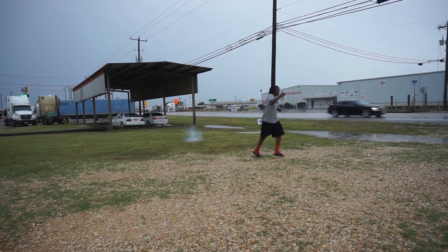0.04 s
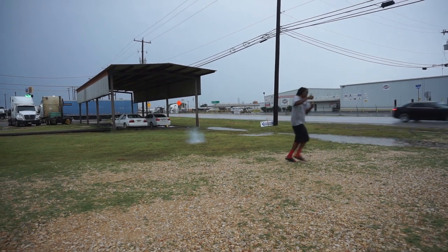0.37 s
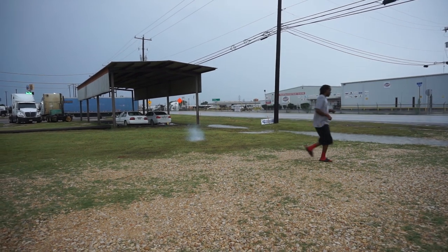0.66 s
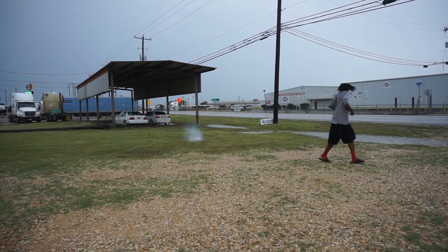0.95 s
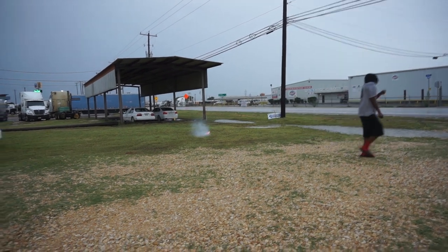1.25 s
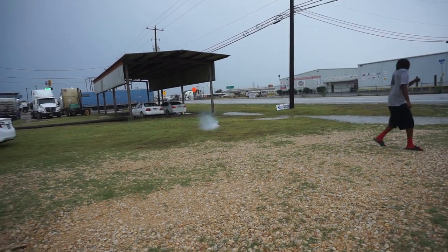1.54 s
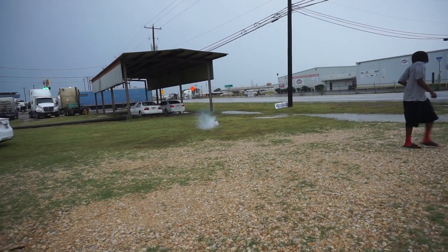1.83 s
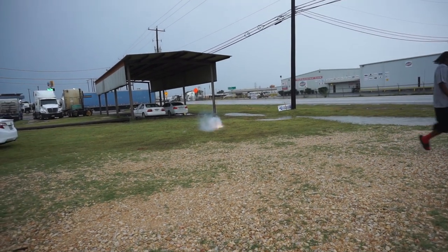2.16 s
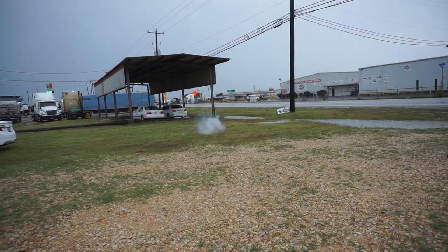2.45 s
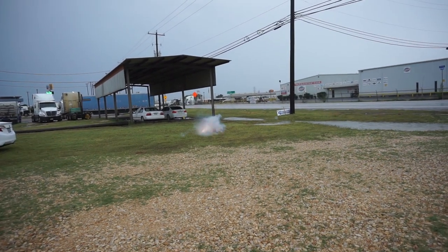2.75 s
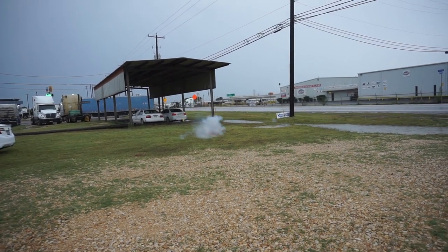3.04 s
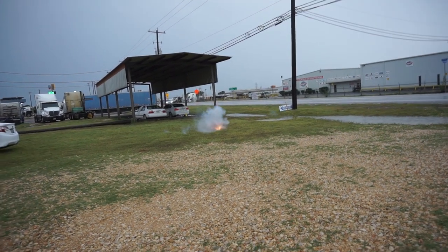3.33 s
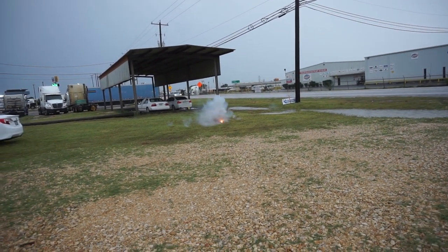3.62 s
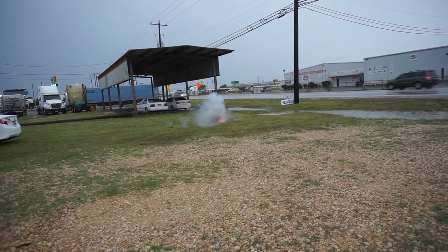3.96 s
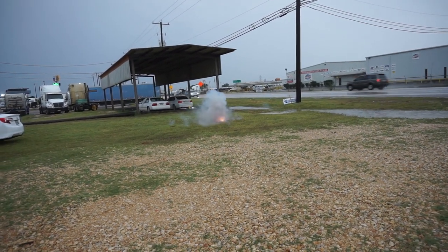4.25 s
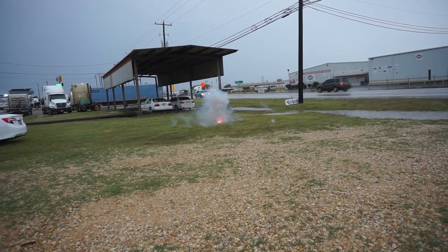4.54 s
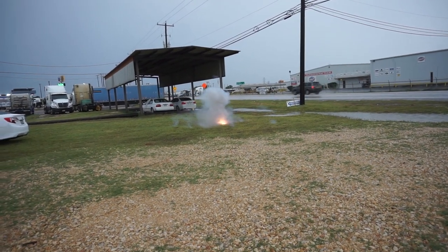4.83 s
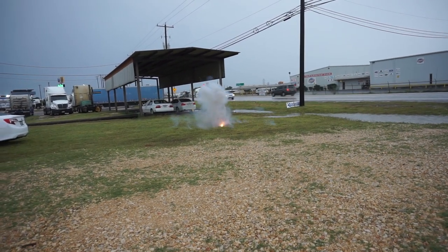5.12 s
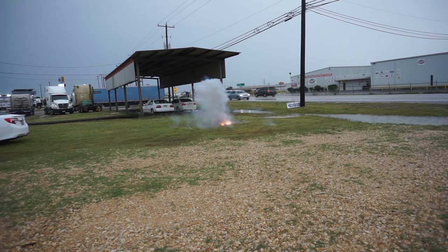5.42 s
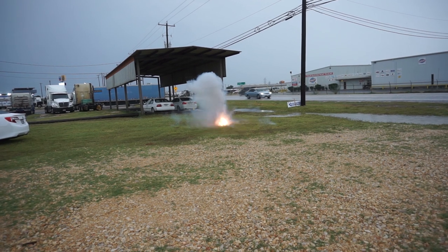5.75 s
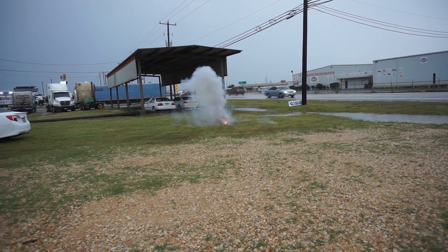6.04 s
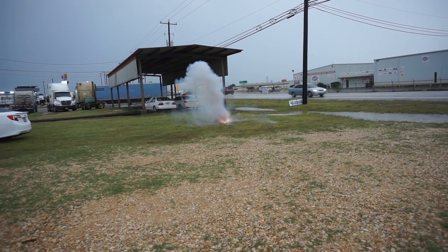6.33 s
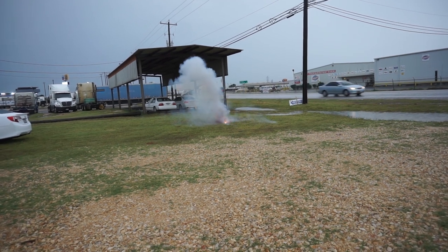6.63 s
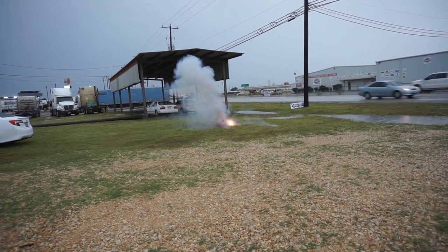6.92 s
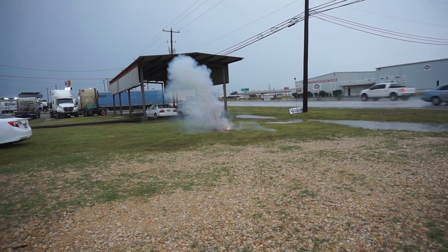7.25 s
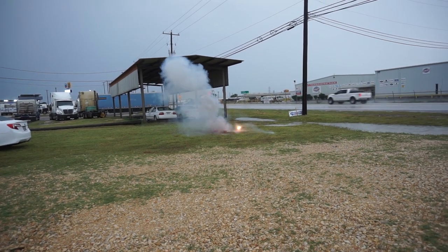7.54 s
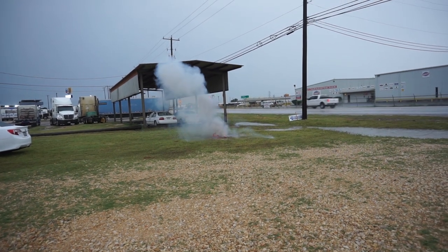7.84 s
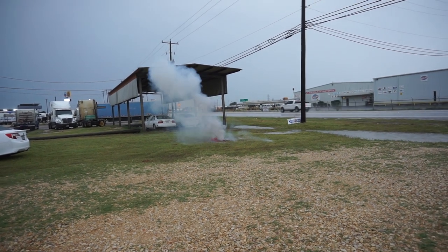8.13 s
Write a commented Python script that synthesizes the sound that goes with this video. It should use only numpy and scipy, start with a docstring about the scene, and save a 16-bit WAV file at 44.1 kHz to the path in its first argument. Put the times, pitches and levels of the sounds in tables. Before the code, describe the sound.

A car passes on the right, its tyres roaring and hissing on a wet road. As it fades, a sharp bang starts a string of firecrackers some distance away outdoors. They pop in fast, uneven runs for about six seconds, echoing lightly off buildings. Two thirds of the way through, the sound drops out for an instant and returns duller and in mono. The popping stops just before the end.

```python
"""A car hisses past on the right, its tyres roaring and throwing spray on a wet road, over a soft wash.
As it leaves, a fuse spits and a string of firecrackers goes off on the grass some fifteen metres away.
Hundreds of paper tubes burst in uneven runs. Each sends out a sharp jump in air pressure, a shock wave,
which bounces off the ground and echoes from a shed and far buildings.
Two thirds through, the sound cuts out for an instant and returns dull and the same in both ears."""
import sys
import numpy as np
from scipy import signal
from scipy.fft import rfft, irfft
from scipy.io import wavfile
from scipy.ndimage import uniform_filter1d, map_coordinates

SR = 44100
rng = np.random.default_rng(int(sys.argv[2]) if len(sys.argv) > 2 else 0)


def materialize(psi):
    """Save the field psi as 16-bit PCM at rate SR to the path in sys.argv[1].

    A 1-D psi becomes a single channel; in a 2-D psi each row is a channel.
    """
    bounded = np.clip(np.atleast_2d(psi).T, -1, 1)
    quanta = np.round(bounded * 32767).astype(np.int16)
    wavfile.write(sys.argv[1], SR, quanta)


N = 369558


def undb(db):
    """Turn decibels into a number to multiply by."""
    return 10 ** (np.asarray(db) / 20)


def colour_db(points, f):
    """A tone colour: the level at each frequency f, falling away below the lowest point."""
    hz, db = np.transpose(points)
    return np.interp(np.log(f + 1), np.log(hz), db) - 10 * np.log10(1 + (.5 * hz[0] / (f + 10)) ** 2)


def resonance_db(modes, f):
    """The peaks and dips that resonances add to a tone colour."""
    return sum(db / (1 + (2 * (f - hz) / width) ** 2) for hz, width, db in modes)


def curves(table):
    """Join a table's points in time with straight lines, one curve per column."""
    times, *columns = np.transpose(table)
    return [np.interp(np.arange(N) / SR, times, column) for column in columns]


def unit(x):
    """Scale to an average power of 1."""
    return x / np.sqrt(np.mean(x ** 2))


def wander(rate_hz):
    """A smooth random wobble of about size 1."""
    hold = int(SR / rate_hz)
    steps = np.repeat(rng.standard_normal(N // hold + 1), hold)
    return unit(uniform_filter1d(uniform_filter1d(steps, hold), hold)[:N])


def opposite(x):
    """Plus x for the left side, minus x for the right."""
    return np.array([[1], [-1]]) * x


def stereo_noise(f, apart_hz):
    """Noise spectra at two close microphones: alike in the bass, unrelated in the treble."""
    mid, side = rng.standard_normal((2, len(f))) + 1j * rng.standard_normal((2, len(f)))
    alike = 1 / (1 + (f / apart_hz) ** 3)
    return mid * np.sqrt(1 + alike) + opposite(side) * np.sqrt(1 - alike)


def delayed(x, ms):
    """Delay a sound by a changing time."""
    return map_coordinates(x, [np.arange(N) - ms * SR / 1000], order=3)


def singing_noise(table):
    """A narrow band of noise whose pitch, width and level move."""
    hz, width, db = curves(table)
    travel = np.cumsum(width) / SR  # a wider band wobbles faster
    wobbles = [map_coordinates(row, [travel], mode="mirror") for row in rng.standard_normal((4, N // 8))]
    phase = 2 * np.pi * np.cumsum(hz) / SR
    mid = wobbles[0] * np.cos(phase) + wobbles[1] * np.sin(phase)
    side = wobbles[2] * np.cos(phase) + wobbles[3] * np.sin(phase)
    return unit(mid + opposite(side) * np.clip(hz / 3000, 0, 1) ** 2) * undb(db)


# The highest hiss of the spray: time_s, level_db
MIST_LEVEL = [(0.0, -33), (0.636, -29), (1.046, -30), (1.31, -37.5), (1.428, -30), (1.524, -35),
              (1.67, -29.5)]
def tyre_levels(t, pass_s=0.69, speed_m_s=22.6, road_m=20.4):
    """Decibels of roar, hiss, spray, mist and top treble: the car fades and dulls as it drives away."""
    near = -20 * np.log10(np.hypot(1, speed_m_s * (t - pass_s) / road_m))
    surge = 4.5 * np.exp(-((t - 1.413) / 0.061) ** 2)  # the wet hiss swells once more
    mist = curves(MIST_LEVEL)[0]
    return near - 25, near + surge - 23, near + surge / 2 - 26, mist, mist + 2.7 * near - 3


# Tone colour of tyres on a wet road: pitch_hz, level_db
TYRE_COLOUR = [(50, -31), (110, -17.5), (170, -15), (270, -6), (400, -9.5), (600, 0), (780, -0.5),
               (1030, -4.5), (1400, -7), (2100, -6.5), (4200, -4.5), (6300, -12.5), (10800, -19),
               (15500, -25.5)]
# Tyre resonances: pitch_hz, width_hz, gain_db
TYRE_RESONANCES = [(281, 75, 3.2), (350, 70, -1.5), (770, 150, -0.5), (1062, 160, -1), (1418, 280, 7)]
def tyres(flutter_db=1.0, bounce_db=1.9, bounce_ms=1.71):
    """Rolling tyres roar and throw hissing spray: five bands of noise, each fluttering on its own."""
    f, t = np.fft.rfftfreq(N, 1 / SR), np.arange(N) / SR
    colour = colour_db(TYRE_COLOUR, f) + resonance_db(TYRE_RESONANCES, f)
    noise = stereo_noise(f, apart_hz=2530) * undb(colour)
    below = [1 / (1 + (f / hz) ** 8) for hz in (950, 2800, 8000, 12500)]
    bands = np.diff([np.zeros_like(f), *below, np.ones_like(f)], axis=0)
    roar, *highs = (unit(irfft(noise * band, N)) * undb(level + flutter_db * wander(25.24))
                    for band, level in zip(bands, tyre_levels(t)))
    hiss = sum(highs)
    # a bounce off the wet ground strengthens some pitches and weakens others
    detour_ms = bounce_ms + 0.074 * wander(1.63)
    bounce = np.array([delayed(side, detour_ms) for side in hiss])
    return roar, hiss + (undb(bounce_db) - 1) * bounce


# The hollow ring under the tyre: time_s, pitch_hz, width_hz, level_db
HOLLOW_RING = [(0, 682, 301, -32), (.5, 720.5, 299.5, -30.5), (.78, 749, 279.7, -25.5),
               (1.02, 739, 319.4, -39.5), (1.35, 520, 450.5, -35.5), (1.68, 500, 448, -36)]
def tyre_hollow():
    """The air between tyre and road rings, loudest as the car draws level."""
    return singing_noise(HOLLOW_RING)


# The whine of the tread: time_s, pitch_hz, width_hz, level_db
TREAD_WHINE = [(0, 2914, 218, -33), (.45, 2930, 261, -39), (1.0, 2496, 702, -44), (1.25, 2410, 749.4, -30),
               (1.42, 2378, 700, -26.5), (1.68, 2313, 699, -28)]
def tread_whine():
    """The tread's whine falls and widens as the car goes by."""
    return singing_noise(TREAD_WHINE)


# Where the car's treble comes from: time_s, left_delay_ms, left_minus_right_db
CAR_DIRECTION = [(0, 0.13, -7.5), (.7, 0.18, -5.5), (1.2, 0.14, -3), (1.7, 0.11, -7.5)]
def car(end_s=1.678, fade_s=0.024):
    """The tyre sounds reach the right microphone first and louder, then fade quickly."""
    t = np.arange(N) / SR
    roar, hiss = tyres()
    lag_ms, pan_db = curves(CAR_DIRECTION)
    out = np.zeros((2, N))
    # the microphones' case shades and delays the treble more than the bass
    for (left, right), shade in ((roar + tyre_hollow(), .45), (hiss + tread_whine(), 1)):
        out += np.array([delayed(left, shade * lag_ms), right]) * undb(opposite(shade * pan_db / 2))
    return out * np.exp(-np.maximum(t - end_s, 0) / fade_s)


# Level of the soft background wash: time_s, level_db
WASH_LEVEL = [(0, -37), (1.73, -38), (1.76, -30.5), (2.0, -29.5), (2.12, -43.5), (8.38, -54.5)]
# Its tone colour: pitch_hz, level_db
WASH_COLOUR = [(50, -31), (130, -19), (230, -9), (350, -7.5), (600, -1.5), (950, -0.5), (1250, 0.5),
               (2100, -7), (4500, -14), (10000, -21), (15500, -34)]
def background_wash(pan_db=-2):
    """A soft wash of noise swells at the first bang and drops after two seconds."""
    f = np.fft.rfftfreq(N, 1 / SR)
    wash = unit(irfft(stereo_noise(f, apart_hz=1210) * undb(colour_db(WASH_COLOUR, f)), N))
    return wash * undb(curves(WASH_LEVEL)[0] + .5 * wander(14) + opposite(pan_db / 2))


def fuse_sparks(start_s=1.5, end_s=4.2, level_db=-35, spread_db=5.0, brightness=4.5, count=30):
    """The burning fuse spits faint, bright ticks. Gives rows like LOUD_BANGS."""
    times = rng.uniform(start_s, end_s, count)
    levels = rng.normal(level_db, spread_db, count)
    return np.column_stack([times, levels, np.full(count, brightness), np.zeros(count)])


def sharpest_pulse(db):
    """Spectrum of the most sudden pulse with this tone colour (minimum phase)."""
    cepstrum = irfft(db * np.log(10) / 20)
    half = cepstrum.shape[-1] // 2
    cepstrum[..., 1:half] *= 2
    cepstrum[..., half + 1:] = 0
    return np.exp(rfft(cepstrum))


# Tone colour of a shock wave: pitch_hz, level_db
SHOCK_COLOUR = [(100, -30), (190, -9), (340, -6.5), (450, -2), (660, 8.5), (900, -4), (1250, -2),
                (1800, -5.5), (2300, -3), (3200, -12.5), (4500, -13), (8000, -17.5), (12500, -21.5),
                (16000, -30)]
# Resonances of the microphones' case: pitch_hz, width_hz, gain_db
CASE_RESONANCES = [(748, 52, 3.5), (1107, 260, 5), (1610, 73, 5), (4300, 170, 2.5), (4730, 77, 2)]
# How the two microphones are shaded: pitch_hz, left_minus_right_db
MIC_SHADING = [(700, 0.5), (1250, 0.5), (1650, -7.5), (2300, -2.5), (3200, -11), (4500, -4.5), (7000, -1.5),
               (13000, 3.5)]
def shock_wave(f, t, brightness, snap_db, snap_hz=4760, snap_octaves=0.67, swing_hz=1700):
    """A paper tube bursts and sends out one shock that swings back. Gives its spectrum."""
    shading = opposite(np.interp(f, *np.transpose(MIC_SHADING)) / 2)
    colour = colour_db(SHOCK_COLOUR, f) + resonance_db(CASE_RESONANCES, f) + shading
    colour += brightness * np.log2(np.clip(f, 550, 5500) / 1200)
    # every tube tears in its own way, which colours its treble
    knots = np.linspace(np.log(200), np.log(SR / 2), 20)
    tear, *sides = (np.interp(np.log(f + 1), knots, row) for row in rng.standard_normal((3, 20)))
    treble = np.clip(f / 2500, 0, 1) / (1 + f / 15000)
    colour += treble * (1.74 * tear + 1.8 * np.array(sides))
    octaves_from_snap = np.log2((f + 1) / snap_hz) - rng.normal(0, 0.13)
    colour += snap_db * np.exp(-(octaves_from_snap / snap_octaves) ** 2)
    swing = (swing_hz - 1j * f) / (swing_hz + 1j * f)  # the bass trails the front of the pulse
    # the tube's far end bursts about half a millisecond later, and the paper rips to shreds
    far_end = undb(-9) * rng.uniform(0, 1.03) * np.exp(-2j * np.pi * f * 0.000515 * rng.uniform(0.21, 1.49))
    rip = rng.standard_normal(len(t)) * np.exp(-t / .00055)
    shreds = undb(-9) * np.clip(f / 5000, 0, 2) * rfft(rip / np.linalg.norm(rip))
    return sharpest_pulse(colour) * swing * (1 + far_end + shreds)


# Bounces off the ground and things nearby: delay_s, level_db
NEAR_BOUNCES = [(.0022, -11), (0.0105, -20)]
def ground_paths(f, t, scatter_db=-13.5, rise_s=0.0034, fade_s=0.0028):
    """A shock arrives directly, by two bounces and scattered by the grass. Gives a spectrum."""
    bounces = sum(undb(rng.normal(db, 2)) * np.exp(-2j * np.pi * f * delay_s * rng.normal(1, 0.052))
                  for delay_s, db in NEAR_BOUNCES)
    grass = rng.standard_normal((3, len(t))) * np.exp(-t / fade_s) * (1 - np.exp(-t / rise_s))
    grass = rfft(grass / np.linalg.norm(grass[0]))
    treble = np.clip(f / 2500, 0, 1)
    scatter = grass[2] * np.sqrt(1 - treble ** 2) + grass[:2] * treble  # both sides share the bass
    return 1 + bounces + undb(scatter_db) * scatter


# The crackers that stand out: start_s, level_db, brightness_db_per_octave, snap_db
LOUD_BANGS = [(1.7079, -10, -2.5, 0.5), (1.755, -21, 0.5, -4), (2.0199, -11.5, -1.5, -0.5),
              (2.0434, -16.5, -0.5, 1.5), (2.0843, -17, 0, -2), (2.1302, -17.5, -1, 2.5),
              (2.172, -21, 1, 3), (2.1889, -18, -6.5, -1.5), (2.2348, -16, 0.0, 0.0),
              (2.2426, -21.5, 1.5, 2), (2.275, -19, 1.5, 2.5), (2.2905, -18.0, -1, 5),
              (2.326, -16, 1.5, 0.0), (2.3901, -17.5, 1.5, -0.5), (2.399, -21.5, 1.5, -6),
              (2.404, -20.5, 0.5, 2.5), (2.4303, -21.5, 2.5, 4.5), (2.441, -21, -1.5, 10),
              (2.4622, -24, -0.5, 6.0), (2.4693, -19.5, 2, -1.5), (2.4756, -22.5, 4, 12.0),
              (2.5006, -22.0, 2, 5.5), (2.5061, -19, -0.5, -1), (2.5152, -22.0, 1.5, 4),
              (2.5349, -17.5, -0.5, 4), (2.539, -17.5, 2.5, 3.5), (2.5709, -19, 1.5, 10.5),
              (2.5832, -17.5, -1, -4.0), (2.5886, -23, 1, 2.0), (2.632, -20.5, -3, 4),
              (2.6444, -19, 2.5, -0.5), (2.683, -16, 0, 5), (2.7108, -15.5, 3, -3.5),
              (2.737, -17.5, -0.5, 8), (2.758, -19.5, -2, 8), (2.8178, -15, 2, -2), (2.8325, -18, -1.5, 5),
              (2.844, -26, -0.5, 4), (2.8761, -17, 1, 6), (2.9001, -22, 2.5, 6), (2.9259, -17, 0.5, -5.5),
              (2.9322, -21.5, 1, -1), (2.9495, -22.0, -0.5, -1), (2.969, -21.5, 2, 2),
              (2.9966, -21.5, 1.5, -0.5), (3.0093, -20.5, 1, 0), (3.0432, -23.5, 0, 4.5),
              (3.0722, -21, -4, 4.5), (3.0856, -16.5, -3, 6.5), (3.0966, -19.0, 2.5, -1.0),
              (3.1016, -19, -1.5, 7), (3.1437, -22, 2.0, -3.5), (3.1705, -22, -2, 1.5),
              (3.2115, -16, 0.5, 1.5), (3.2184, -17.5, -4, 4), (3.2271, -22.5, 3.5, 5),
              (3.2401, -18.0, 1, 0), (3.2727, -22, 1.5, -2.5), (3.277, -21.5, 1, -1.5),
              (3.2922, -28, 0, 10), (3.3205, -20.5, 0, 6), (3.3412, -17.5, 1, -3), (3.3512, -22, -1.5, 8.5),
              (3.3869, -21, 1, 7.5), (3.4033, -22.5, 3.5, -5.5), (3.4236, -21.5, 1, 10.5),
              (3.4357, -16, 1.5, -1.5), (3.4483, -32, 1.5, 9.5), (3.4703, -19, 2.5, 4.0),
              (3.4872, -25.5, 0, 10.5), (3.5146, -20, 2, 0.0), (3.5236, -19, 0.5, 13.5),
              (3.535, -22.5, 1.5, 11.0), (3.5671, -20, 2, -8.5), (3.5773, -20.0, 2, 0),
              (3.5884, -21, 2.5, 3), (3.5913, -20.5, -0.5, 11.5), (3.6066, -24, 1.0, 6.5),
              (3.6337, -22, 1, 3), (3.6377, -18.5, 1, 5), (3.6447, -20.5, 1.5, 1), (3.6596, -19.5, 3, -3.5),
              (3.68, -21.5, 1.5, -3.5), (3.7081, -22.0, 2.5, 0.5), (3.7203, -18.5, 1.0, 2),
              (3.728, -20, 0.5, 1.5), (3.7363, -19, 2, -3), (3.7542, -22.5, 0.5, 6), (3.7606, -15, -0.5, 0),
              (3.7797, -19, 1.5, 1.0), (3.8001, -20.5, -1, -1.0), (3.8174, -17.5, 1, 0.5),
              (3.8298, -19.5, 2.5, -3.5), (3.8325, -21.5, 3, -2.5), (3.8433, -20.5, 2, -7.5),
              (3.8452, -17.5, 0.5, 4), (3.8558, -23, 2, 1), (3.8623, -23.5, 1.5, 0.5),
              (3.8653, -20, 2, -3.5), (3.882, -20.5, 2.5, 2.5), (3.8888, -22, 1.5, 4),
              (3.903, -22, 0.5, 6.5), (3.9215, -18.5, 2.5, -3), (3.9432, -18, 1, 8),
              (3.9524, -20.5, 0.0, 4), (3.9635, -19, 3, 3.0), (3.97, -19, 4, 0.5), (3.989, -20.5, 1.5, 6.0),
              (4.0042, -19, 0.5, 4.5), (4.0468, -20.0, 0.5, 1.5), (4.0501, -17, -0.5, 10.5),
              (4.0542, -18.5, 3.5, 1.0), (4.0682, -26, 6.5, -1), (4.0969, -20.5, 2.5, 1.5),
              (4.103, -20, -1, 3.5), (4.1246, -19.5, 3, -1), (4.1366, -20, 3.5, 3.5),
              (4.1423, -17.0, 2, -2.5), (4.1584, -24, 1, 5), (4.1844, -17.5, -1, 0.0), (4.195, -20, 0, 4),
              (4.2073, -18.5, 8, -4), (4.22, -18, 0.5, 0.0), (4.2434, -19.5, 1.0, 0.0),
              (4.2591, -16.5, -0.5, -2.5), (4.2696, -13.5, 2.5, -8.5), (4.2843, -15, 0, 0.5),
              (4.3183, -19.5, 0, 4.5), (4.3551, -15, 1.5, -1.0), (4.3743, -15.5, 1, -1),
              (4.3815, -19.5, 1.5, 0.5), (4.3975, -19, 0.5, 4), (4.418, -18.5, 0, 5),
              (4.421, -19.5, 2, 9.5), (4.4304, -22, -0.5, -3), (4.4489, -21.0, 6, 2.5),
              (4.456, -21.5, 4, 4.5), (4.4915, -18.5, 2.5, 3), (4.5044, -20.5, 0, 2),
              (4.5375, -20.0, 2, 11), (4.565, -20, 0, 8.5), (4.5925, -19.5, 6.5, -9), (4.6166, -22, 0, 7.0),
              (4.6312, -21.5, 4, 2.5), (4.6451, -18, 0.5, 5.5), (4.665, -20, 0.5, 1),
              (4.7189, -22, 3.5, -1), (4.7334, -19.5, 1, -6.5), (4.777, -18, 3, -2),
              (4.7864, -21.0, -0.5, 4), (4.8196, -17.5, -0.5, 3), (4.849, -19.0, 0.5, 2),
              (4.8569, -20, 1, 3), (4.8762, -20.5, 0.0, 4.5), (4.9133, -18, -0.5, 2), (4.916, -22, 1.0, 3),
              (4.9261, -22.0, 1.5, 1.0), (4.9444, -19.5, 3, 1), (4.9571, -20, 2.5, 0),
              (4.9746, -21.5, 2.5, 5.5), (5.0314, -18.5, 0, 0.5), (5.0392, -19.5, -0.5, 0),
              (5.0576, -18, 1.5, -0.5), (5.0653, -21.5, -0.5, 5), (5.0733, -21.5, 2.5, 2),
              (5.0761, -18.0, -0.5, -1.5), (5.1094, -22, 0.5, -1.5), (5.1194, -20.5, 1.5, -5),
              (5.1236, -18.5, 4, -3.5), (5.1543, -19.5, 2.5, 6), (5.1579, -23, 0, -4.5),
              (5.1621, -22.5, 0.5, 0), (5.181, -22.5, 2, 2), (5.1919, -22.0, 0.5, 9),
              (5.2366, -18.5, 3, -5), (5.2456, -20.5, 4.0, 1), (5.2652, -21.5, 3.5, 5),
              (5.2843, -18, 0.5, 1.5), (5.3063, -17, 2, -2), (5.3142, -24, -1, 3.0),
              (5.3162, -23, 2.5, 7.0), (5.331, -21.5, 4, -0.5), (5.343, -20.5, 2.0, -5),
              (5.35, -20, 0, 2.5), (5.3636, -23.5, 4, 5.5), (5.3895, -22.5, 1.5, 2), (5.4043, -17, 2, -1.0),
              (5.4117, -20.5, 5, -8), (5.4601, -17.5, 5.5, 5), (5.4648, -19.5, 1.5, -9),
              (5.4844, -23, 1.5, -1), (5.5021, -20.5, 2, 2.5), (5.514, -20.5, 2.0, 1.5),
              (5.531, -19.5, -0.5, 8), (5.6526, -21.5, 0, -4.5), (5.6644, -24, -4, -1),
              (5.6906, -20.5, -3.5, 8.0), (5.6969, -19.5, -1, 1), (5.7135, -19.5, 0.5, -7.5),
              (5.7469, -21, -2.5, 10), (5.7613, -18, -3.0, 3.5), (5.7893, -20.5, -1.5, 5),
              (5.8026, -22.5, -3, 6), (5.8076, -22, -2, 5), (5.8159, -20.5, 1.5, -8),
              (5.8242, -20.5, -1, 5.5), (5.8828, -18, -3.5, 3), (5.9011, -19.5, 0.5, -1.5),
              (5.9058, -19.5, 0.5, 6.0), (5.9086, -23.5, 0, -1), (5.9157, -21, -1.5, 7),
              (5.96, -17.5, -1.5, 0), (5.967, -22, -2.5, -3.5), (5.9899, -20, -3.5, 9),
              (6.0424, -16.5, 0, -11), (6.0511, -21.5, 0.5, -7.5), (6.0754, -22, 0, -9),
              (6.113, -23, 1.5, -6.5), (6.1182, -22, -1, -6.5), (6.1245, -22, 0.5, -11),
              (6.1566, -22.5, -0.5, -6), (6.1646, -19.0, 0, -7.0), (6.188, -21.0, -0.5, -1.5),
              (6.195, -23, -0.5, -3.5), (6.2277, -20, 0.5, -1.5), (6.2449, -23.0, -3, 13),
              (6.2488, -25, 0.5, -1.5), (6.2663, -18.0, -1.5, -1.5), (6.2829, -21, 2, -10.5),
              (6.292, -17.5, -1, -8.5), (6.3179, -21, 2.5, -4.5), (6.3409, -17.5, -1, -3.5),
              (6.3543, -22.5, -6.5, -9), (6.3775, -21.5, 1, 2.0), (6.4173, -19.5, 1.0, -8.5),
              (6.4719, -19.5, -1, -3), (6.475, -19, 2.5, -7.5), (6.4918, -21, 2, -0.5),
              (6.4974, -19.5, -0.5, 1), (6.5195, -23, -3, 0.5), (6.5259, -24, 1, -10),
              (6.5354, -22, 0.5, 6.5), (6.563, -20.5, 3, -11), (6.5822, -21.0, -3.5, -1),
              (6.6026, -21, -5.5, 8), (6.6373, -20, -3.5, 0.5), (6.64, -22.5, 2.5, -9),
              (6.65, -20.5, -1, -7.0), (6.6614, -18.5, 0.5, -1), (6.6715, -22, 0.5, -4.5),
              (6.6943, -20.5, -1, -6), (6.7216, -24.5, -1.0, 12.0), (6.724, -20, -2.5, 15),
              (6.755, -19.5, -1.5, 2), (6.8, -17, 0.5, -3), (6.8176, -20, -2.5, -1),
              (6.8318, -17.5, -0.5, -6), (6.8372, -21, -5, 6.5), (6.8462, -17.5, 1, -10.5),
              (6.8569, -23.5, 1, -5.5), (6.8902, -22.5, -0.5, 0), (6.892, -19.5, -6.5, 9.0),
              (6.9043, -18, -1, 6), (7.0096, -20.5, -3.5, 0), (7.02, -21, -0.5, 5.5),
              (7.0289, -22.5, 0, -3.0), (7.0514, -20.5, -1.5, 1.0), (7.078, -21, 0.0, 2.5),
              (7.1159, -18.5, -3.5, 12.0), (7.1375, -23, -1, -2), (7.1765, -19.0, 3, -13.5),
              (7.1856, -23, 0, -7), (7.2151, -17, -1.5, -2.0), (7.2613, -18, -0.5, -5.5),
              (7.2647, -17.0, 0.5, -4.0), (7.297, -20.5, -0.5, -8.5), (7.316, -22, -3, -3),
              (7.3268, -18, -1, -8.5), (7.3526, -18, -1.0, 5.5), (7.3827, -21, 0, -0.5),
              (7.42, -21.0, -1.0, 2), (7.4295, -20.0, 0.5, -4), (7.4345, -24, -0.5, -7),
              (7.4461, -19, 0, -2), (7.466, -19.5, -1, -3.0), (7.5023, -19, -2.5, 1), (7.514, -17, 0, 1.5),
              (7.5295, -21.0, -2, -4.5), (7.5471, -20, 0, -1.5), (7.5665, -20, 1.0, -11),
              (7.5951, -21, 3, -4.5), (7.6014, -19.5, -2, 4), (7.6165, -19.5, -2, 0.0),
              (7.6212, -17.5, 0, -11.5), (7.6642, -16.5, 3.5, -6), (7.6737, -20.5, -3.5, -7.5),
              (7.6922, -20, 1.5, 4), (7.7229, -20.5, 2.5, -12), (7.7425, -17.5, -1, -1.5),
              (7.7568, -20, -4.5, 5), (7.8259, -17.5, 1, -2), (7.85, -19.5, -0.5, -2.5),
              (7.8935, -20.5, -0.5, 9.5), (7.9451, -20, 1.0, -5), (8.179, -34.5, 3.5, -12)]
def firecrackers(size=1024):
    """Every bang, volley cracker, dud and spark is one shock wave travelling over the grass."""
    f, t = np.fft.rfftfreq(size, 1 / SR), np.arange(size) / SR
    out = np.zeros((2, N + size))
    reports = np.vstack([LOUD_BANGS, volleys(), duds(), fuse_sparks()])
    for start_s, level_db, brightness, snap_db in reports:
        wave = shock_wave(f, t, brightness, snap_db)
        # as much energy as 3.1 ms of steady sound at this level
        wave *= undb(level_db) * np.sqrt(0.0031 * SR) / np.linalg.norm(irfft(wave.mean(0)))
        start = int(round(start_s * SR))
        out[:, start:start + size] += irfft(wave * ground_paths(f, t))
    return out[:, :N]


# Tone colour of the far echoes: pitch_hz, level_db
FAR_ECHO_COLOUR = [(100, -28.5), (210, -6.5), (360, -9), (480, -5), (650, 0.5), (900, -2), (1250, -1),
                   (1800, -8), (2700, -6.5), (4500, -17.5), (8000, -20), (16000, -18)]
def echoes(bangs, level_db=-7.5, ring_s=(1.0, 2.05, 0.87), shed_db=3, shed_fade_s=0.034, size=65536):
    """The shed answers at once; far walls roll on for over a second, bass and treble dying first."""
    f, t = np.fft.rfftfreq(size, 1 / SR), np.arange(size) / SR
    far = stereo_noise(f, apart_hz=967) * undb(colour_db(FAR_ECHO_COLOUR, f) - colour_db(SHOCK_COLOUR, f))
    bass, below_treble = 1 / (1 + (f / 420) ** 6), 1 / (1 + (f / 4500) ** 4)
    bands = bass, below_treble - bass, 1 - below_treble
    walls = sum(irfft(far * band) * undb(-60 * t / seconds) for band, seconds in zip(bands, ring_s))
    shed = irfft(stereo_noise(f, apart_hz=950)) * undb(shed_db) * np.exp(-t / shed_fade_s)
    onset = np.clip(t / 0.006 - 1, 0, 1)
    patchiness = undb(5.0 * wander(300)[:size])
    echo = signal.fftconvolve(bangs.mean(0)[None], (walls + shed) * onset * patchiness, axes=1)[:, :N]
    return unit(echo) * np.std(bangs) * undb(level_db)


def duds(level_db=-30, spread_db=3.0, count=60):
    """Feeble crackers pop between the loud ones where the string burns fast. Gives rows like LOUD_BANGS."""
    starts = np.sort(np.array(LOUD_BANGS)[:, 0])
    gaps = np.diff(starts)
    odds = gaps * ((gaps > .007) & (gaps < .036))
    chosen = rng.choice(len(gaps), count, replace=False, p=odds / odds.sum())
    times = starts[chosen] + gaps[chosen] * rng.uniform(.25, .8, count)
    loud, bright = rng.standard_normal((count, 2)).T
    return np.column_stack([times, level_db + spread_db * loud, 1 + bright, np.zeros(count)])


# Quick runs of weaker crackers: start_s, length_s, cracker_count
CRACKER_RUNS = [(2.483, 0.0284, 2), (3.121, 0.034, 5), (3.2577, 0.0318, 2), (3.3554, 0.0898, 7),
                (3.4752, 0.055, 6), (3.64, 0.045, 6), (3.8216, 0.018, 2), (3.8786, 0.058, 6),
                (3.976, 0.066, 5), (4.149, 0.0418, 4), (4.333, 0.0112, 2), (4.4584, 0.026, 2),
                (4.6737, 0.081, 6), (4.831, 0.092, 6), (4.9704, 0.02, 5), (5.138, 0.088, 8),
                (5.245, 0.0108, 2), (5.3284, 0.0127, 2), (5.3937, 0.0039, 2), (5.4326, 0.017, 4),
                (5.573, 0.042, 4), (5.6482, 0.077, 5), (5.9203, 0.036, 2), (6.0579, 0.0061, 3),
                (6.1008, 0.077, 6), (6.3524, 0.073, 6), (6.5391, 0.079, 11), (6.6898, 0.013, 2),
                (6.7864, 0.0221, 2), (6.8777, 0.1, 9), (6.983, 0.0057, 2), (7.0236, 0.035, 2),
                (7.1213, 0.056, 3), (7.2677, 0.066, 4), (7.47, 0.0069, 2)]
def volleys(level_db=-25.0, spread_db=1.5, stagger=.35):
    """The fuse burns evenly, but crackers fire a little early or late. Gives rows like LOUD_BANGS."""
    rows = []
    for start_s, length_s, count in CRACKER_RUNS:
        slip, loud, bright, snap = rng.standard_normal((count, 4)).T
        place = np.arange(count) + stagger * np.tanh(slip)
        place[0], place[-1] = 0, count - 1
        times = start_s + length_s * place / (count - 1)
        rows.append(np.column_stack([times, level_db + spread_db * loud, 0.5 + bright, 3 * snap]))
    return np.vstack(rows)


def scene():
    """Firecrackers and their echoes, with the passing car and a soft background wash."""
    bangs = firecrackers()
    return bangs + echoes(bangs) + car() + background_wash()


def low_pass(x, hz):
    """Cut away everything above hz."""
    return signal.sosfilt(signal.ellip(10, .1, 80, hz, fs=SR, output="sos"), x)


def record(dry, rumble_hz=142, ceiling=0.59, dropout_s=5.535, return_s=5.554, dull_hz=5650):
    """Rumble is cut and peaks are rounded; the sound drops out, then comes back dull and mono."""
    f, t = np.fft.rfftfreq(N, 1 / SR), np.arange(N) / SR
    trimmed = signal.sosfilt(signal.butter(2, rumble_hz, "high", fs=SR, output="sos"), dry)
    stereo = trimmed / (1 + (trimmed / ceiling) ** 4) ** .25
    mono = 0.05 * stereo[0] + 0.95 * stereo[1]  # mostly the right side
    dull = irfft(rfft(mono) / np.sqrt(1 + (f / dull_hz) ** 20), N)
    dull = low_pass(dull, hz=6850) * undb(-1.14)
    fade_out = np.exp(-np.maximum(t - dropout_s, 0) / .0045)
    fade_in = 1 - np.exp(-np.maximum(t - return_s, 0) / .0064)
    return low_pass(stereo * fade_out + dull * fade_in, hz=15900)


dry = scene()
out = record(dry)
materialize(out)
```